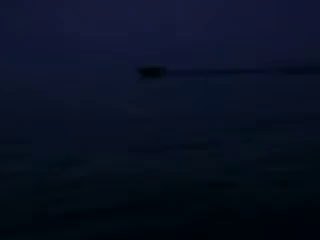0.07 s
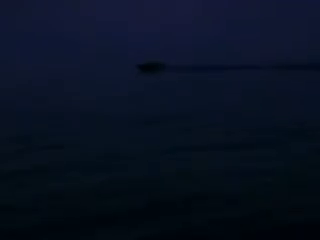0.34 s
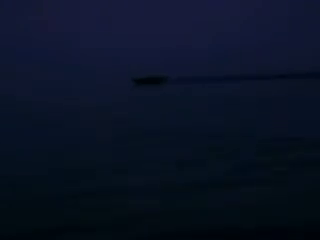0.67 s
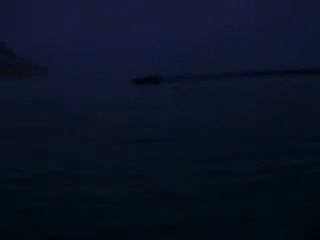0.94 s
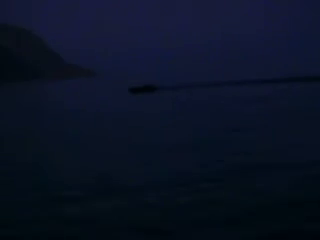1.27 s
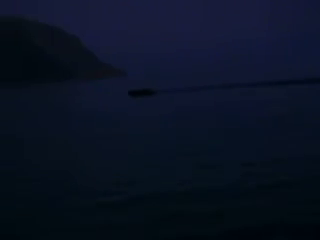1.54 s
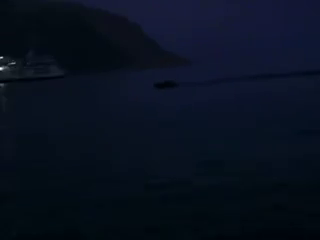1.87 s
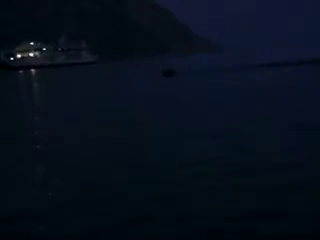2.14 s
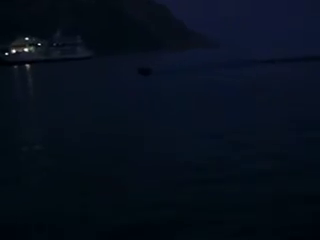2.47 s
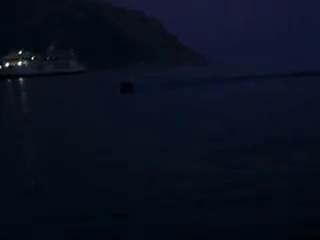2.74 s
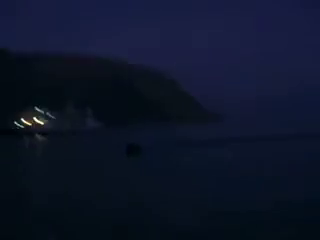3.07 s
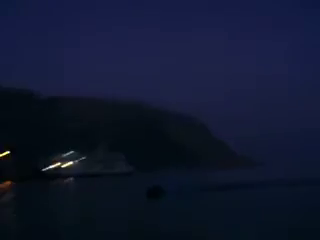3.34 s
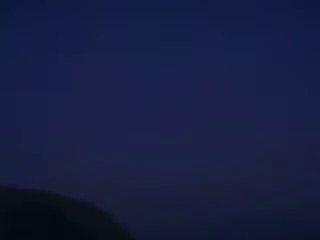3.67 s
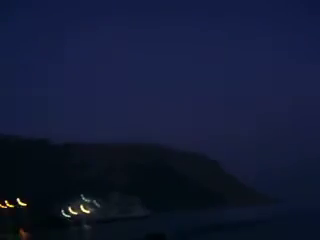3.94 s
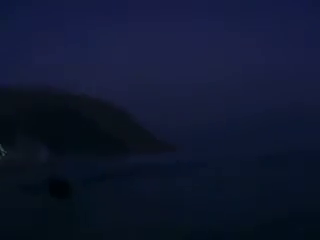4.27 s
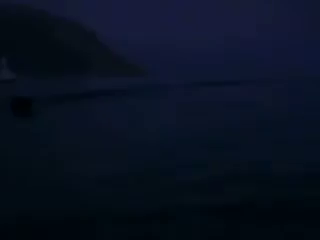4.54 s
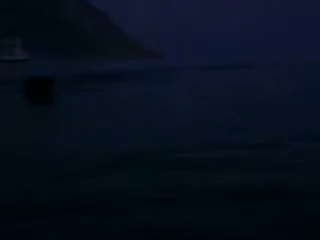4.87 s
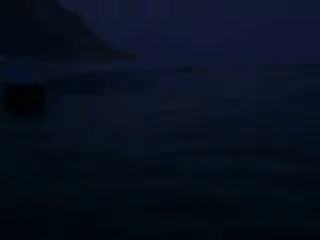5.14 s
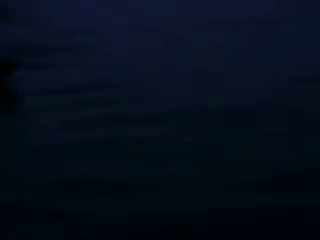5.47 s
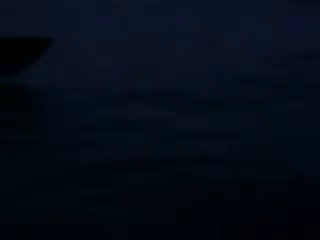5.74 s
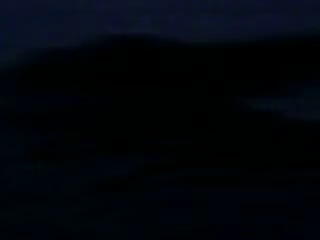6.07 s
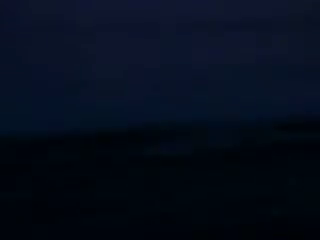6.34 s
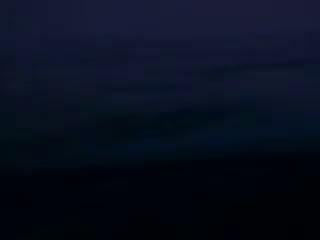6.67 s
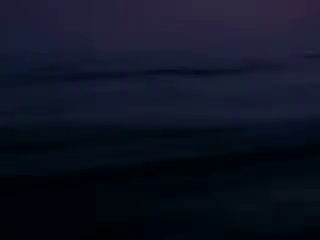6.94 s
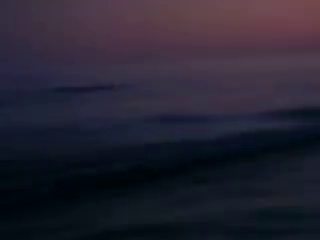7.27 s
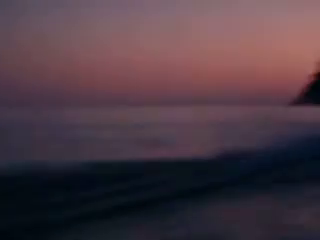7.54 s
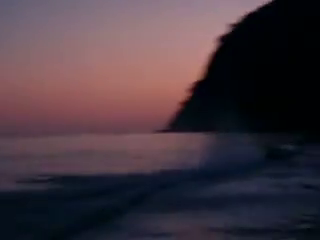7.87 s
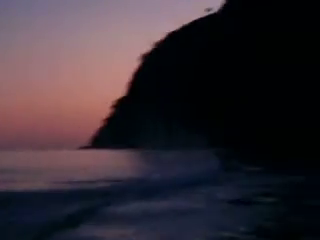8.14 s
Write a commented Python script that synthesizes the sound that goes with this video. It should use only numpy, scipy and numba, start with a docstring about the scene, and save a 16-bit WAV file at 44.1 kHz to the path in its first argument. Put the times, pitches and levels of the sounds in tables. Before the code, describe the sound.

A small model speedboat motor rasps across calm water, dips and picks up, then passes close with a deep hum and churning spray.

```python
"""A radio-controlled speedboat circles on a calm sea, its small motor firing once a turn into a resonant
exhaust pipe. One sharp, bright click comes just after the start; the throttle closes, and the motor
stumbles, then picks up. The boat turns and runs in towards the shore, raspy bow-on, while a few soft
knocks and thumps sound at the narrow-band microphone. At about 5.5 s it passes close by and heads away,
a deep hum in churning spray."""
import sys
import numpy as np
from scipy import signal
from scipy.fft import rfft, irfft, next_fast_len
from scipy.io import wavfile
from scipy.ndimage import uniform_filter1d, map_coordinates
from numba import njit

SR = 44100
rng = np.random.default_rng(int(sys.argv[2]) if len(sys.argv) > 2 else 0)


def wav_record(signal):
    """Record a signal, one row per channel, as 16-bit PCM in the file named by sys.argv[1]."""
    frames = np.transpose(np.atleast_2d(signal))
    bounded = np.clip(frames, -1, 1)
    # unit amplitude maps onto the largest positive 16-bit level
    quanta = np.round(bounded * 32767).astype(np.int16)
    wavfile.write(sys.argv[1], SR, quanta)


N = 361619
TIME = np.arange(N) / SR
HUM_TOP_HZ = 577


def from_db(db):
    """Amplitude ratio of a level in decibels."""
    return 10 ** (np.asarray(db) / 20)


def rms_one(x):
    """Normalisation to rms 1."""
    return x / np.sqrt(np.mean(x ** 2) + 1e-20)


def slow_rms(x):
    """Running rms over many firings."""
    size = SR // 8
    return np.sqrt(uniform_filter1d(uniform_filter1d(x * x, size), size) + 1e-12)


def evened(x):
    """Slow gain control: the running rms is held at 1, while single firings still differ."""
    return x / slow_rms(x)


def in_time(rows):
    """Linear interpolation of a table's columns at every sample."""
    times, *columns = np.transpose(rows)
    return [np.interp(TIME, times, column) for column in columns]


def ramp(start_s, end_s):
    """Linear rise from 0 to 1."""
    return np.clip((TIME - start_s) / (end_s - start_s), 0, 1)


def swell(centre_s, half_s):
    """Gaussian envelope of height 1."""
    return np.exp(-((TIME - centre_s) / half_s) ** 2)


def drift(knots_per_s):
    """Smooth random modulation with a spread of about 1."""
    return map_coordinates(rng.standard_normal(4096), [TIME * knots_per_s], order=3, mode="wrap")


def delayed(x, delay_s):
    """Delay line of steady or changing length."""
    return np.interp(TIME - delay_s, TIME, x, left=0)


def low_passed(x, hz, order):
    """Causal Butterworth low-pass filter."""
    return signal.sosfilt(signal.butter(order, hz, fs=SR, output="sos"), x)


def below(x, hz):
    """Zero-phase crossover: the part of x under hz."""
    return signal.sosfiltfilt(signal.butter(6, hz, fs=SR, output="sos"), x)


def coloured(x, spectrum):
    """Minimum-phase filter with the given spectrum, made causal by folding the cepstrum."""
    size = next_fast_len(N + SR // 2, real=True) // 2 * 2
    hz, db = np.transpose(spectrum)
    bin_hz = np.arange(size // 2 + 1) * SR / size
    gain = from_db(np.interp(np.log(bin_hz + 1), np.log(hz), db))
    cepstrum = irfft(np.log(gain))
    cepstrum[1:size // 2] *= 2
    cepstrum[size // 2 + 1:] = 0
    return irfft(rfft(x, size) * np.exp(rfft(cepstrum)))[:N]


def resonance(x, hz, width_hz):
    """Two-pole resonator with a peak gain of 1."""
    r = np.exp(-np.pi * width_hz / SR)
    poles = [1, -2 * r * np.cos(2 * np.pi * hz / SR), r * r]
    return signal.lfilter(np.array([1, 0, -1]) * (1 - r * r) / 2, poles, x + 1e-18)


@njit
def gliding_resonance(x, hz, width_hz):
    """Two-pole resonator whose centre frequency moves."""
    r = np.exp(-np.pi * width_hz / SR)
    feedback = 2 * r * np.cos(2 * np.pi * hz / SR)
    y = np.zeros(len(x))
    for i in range(2, len(x)):
        y[i] = (1 - r * r) / 2 * (x[i] - x[i - 2]) + feedback[i] * y[i - 1] - r * r * y[i - 2]
    return y


def firings(turns, speed_hz, lost_hz):
    """Impulse train, one firing a turn; its shimmer and jitter grow as the motor stumbles or slows."""
    # bangs and misfires that stand out: time_s, level_db
    odd_firings = [(.211, 3.5), (.221, -3.5), (.3, -4), (.352, -5.5), (.373, -5), (.384, 1.5), (.395, -4.5),
                   (.463, 2), (.486, 1.5), (.498, -5), (.521, -8.5), (.581, -2.5), (.605, 6), (.641, 3),
                   (.7, -3.5), (.712, 3.5), (.723, -6.5), (.759, -2), (.783, 3.5), (.808, 3.5), (.82, -2.5),
                   (.92, 4), (.932, -3.5), (.945, 4), (.957, -6), (1.031, -4.5), (1.093, 4.5), (1.105, -5),
                   (4.335, 1.5), (4.346, 4.5), (4.357, -4), (4.699, 4), (4.954, -2.5), (5.24, -5),
                   (5.25, 2.5)]
    weak_share, weak_db, hardest_db, jitter_ms_per_db, rebound = 0.051, -3, 1.5, 0.012, 0.17
    at = np.flatnonzero(np.diff(np.floor(turns)))
    stumble_db = 0.09 * lost_hz * (1 - ramp(0.96, 1.1))   # ends as the throttle opens again
    slowing_hz_per_s = np.maximum(-np.gradient(speed_hz, TIME), 0)
    uneven_db = (0.74 + stumble_db + 0.012 * slowing_hz_per_s)[at]
    shimmer, jitter = rng.standard_normal((1024, 2))[:len(at)].T
    weak = rng.random(1024)[:len(at)] < weak_share
    swing = rms_one(signal.lfilter([1], [1, rebound], shimmer))   # a soft firing makes the next harder
    firing_db = np.minimum(uneven_db * swing, hardest_db) + weak_db * weak
    for time_s, level_db in odd_firings:
        firing_db[np.argmin(np.abs(TIME[at] - time_s))] = level_db
    late = np.round(jitter_ms_per_db * SR / 1000 * uneven_db * jitter).astype(int)
    pulses = np.zeros(N)
    pulses[np.clip(at + late, 0, N - 1)] = from_db(firing_db)
    return pulses


def exhaust(pulses, speed_hz):
    """Source and filter: each pressure pulse and its puff of gas echo in the pipe and ring its shell."""
    # reflections inside the pipe: delay_ms, gain
    echoes = [(0.729, -0.3), (5.099, 0.051)]
    # modes of pipe and hull: centre_hz, width_hz, gain_db
    modes = [(423, 480, -7.5), (780, 490, -10.5), (1840, 200, -18.5), (2455, 41, -2)]
    # spectral envelope of the exhaust: frequency_hz, gain_db
    pulse_spectrum = [(60, -43.5), (95, -23), (140, -10), (190, 2.5), (350, 2), (560, 2), (760, 4),
                      (930, 3.5), (1100, 8.5), (1300, 1.5), (1600, 3.5), (2100, 1), (2450, -6),
                      (2800, -8.5), (3300, -16.5), (4300, -26.5)]
    gas_db, gas_decay_ms, steady_top_hz, shut_turn = -19, 11, 446, 0.372
    puff = signal.lfilter([1], [1, -np.exp(-1000 / (gas_decay_ms * SR))], pulses + 1e-18)
    gas = rms_one(low_passed(puff * rng.standard_normal(N), hz=1230, order=1))
    # every stroke expels the same volume, so the lows stay even and only the sharp front varies
    front = pulses + below((pulses > 0) - pulses, steady_top_hz)
    # the port shuts part of a turn later, with a weaker pulse of opposite sign
    shutting = -0.18 * delayed(front - below(front, steady_top_hz), shut_turn / speed_hz)
    blast = front + shutting + from_db(gas_db) * np.std(front) * gas
    piped = blast + sum(gain * delayed(blast, ms / 1000) for ms, gain in echoes)
    ringing = sum(from_db(db + 2 * drift(7.8)) * resonance(piped, hz, width) for hz, width, db in modes)
    return evened(coloured(piped + ringing, pulse_spectrum))


def honk(motor, run_in):
    """A hollow resonance of the pipe, fading on the run in."""
    return from_db(-8) * (1 - run_in) * resonance(motor, hz=750, width_hz=140)


def nasal(motor, bared_db):
    """A nasal pipe resonance, strongest bow-on, modulated as water laps over the outlet."""
    # the resonance as the heading changes: time_s, centre_hz, gain
    nasal_path = [(0, 1980, 0.33), (.28, 1950, .3), (.47, 1840, .55), (1.15, 1820, .35), (1.9, 2120, 0.69),
                  (2.65, 2114, 0.87), (4.7, 2180, 1.4), (5.35, 2100, 1.0), (5.7, 2200, 0.2),
                  (6.3, 1880, 0.17), (8.2, 1860, 0.18)]
    centre_hz, gain = in_time(nasal_path)
    centre_hz = centre_hz + 40 * drift(25)
    gain = gain * from_db(3 * drift(40)) + 0.18 * np.clip(bared_db, 0, 3.5)
    return gain * gliding_resonance(motor, centre_hz, width_hz=330)


def snarl(motor, speed_hz):
    """A formant on the 16th harmonic slides down with the speed as the throttle closes."""
    gain = from_db(-7.5) * (1 - ramp(0.55, 0.58))
    return gain * gliding_resonance(motor, 16 * speed_hz, width_hz=300)


def shore_reflection(motor):
    """A weak reflection of the upper band off the shore; with the direct sound it forms a comb filter."""
    # lag behind the direct sound, growing as the boat runs in: time_s, delay_ms
    shore_lag = [(3.2, 2.824), (4.5, 3.7)]
    delay_ms, = in_time(shore_lag)
    return 0.11 * delayed(motor - below(motor, HUM_TOP_HZ), delay_ms / 1000)


def churn(turns):
    """Turbulence at the propeller: lumpy noise, amplitude-modulated at the shaft rate."""
    # spectrum of the churning water: frequency_hz, gain_db
    churn_spectrum = [(30, -36.5), (110, -23.5), (190, -19.5), (330, -0.5), (550, 3), (1000, 3.5),
                      (1400, 0.5), (2100, -3.5), (2700, -12), (3300, -11.5), (4300, -31)]
    throb = 1 + 0.16 * np.cos(2 * np.pi * turns)
    lumps = from_db(-0.5 * drift(120))
    return rms_one(coloured(throb * lumps * rng.standard_normal(N), churn_spectrum))


def radiated(boat, level_db, bow, astern, lost_hz, bared_db):
    """Directivity and shielding: heading, distance, speed and waves weight the bass, rasp and edge."""
    # gain of each band: side_db, bow_added_db, astern_added_db, db_per_lost_hz, db_per_near_db
    bass_weights = (1.0, 3.5, 4, 0.13, -0.2)
    rasp_weights = (0.19, 1.3, -1.7, -0.094, -0.48)
    edge_weights = (-8, 7.5, 1, -0.56, 0.49)
    bass_top_hz, bark_top_hz, rasp_top_hz = 540, 1330, 2271
    near_db = level_db - level_db.mean()
    bass_db, rasp_db, edge_db = (
        side + ahead * bow + behind * astern + slowed * lost_hz + near * near_db
        for side, ahead, behind, slowed, near in (bass_weights, rasp_weights, edge_weights))
    bass_db = bass_db + 0.88 * bow * near_db   # bow-on, the bass grows faster as the boat nears
    body, under_edge = below(boat, bark_top_hz), below(boat, rasp_top_hz)
    bark = body / slow_rms(body - below(body, HUM_TOP_HZ))
    bass_lift = (from_db(bass_db) - 1) * below(bark, bass_top_hz)
    rasp = from_db(rasp_db) * evened(under_edge - body)
    edge = from_db(edge_db) * evened(boat - under_edge)
    return from_db(level_db) * (bark + bass_lift + from_db(bared_db) * (rasp + edge))


def hum(turns, far_db, bow, astern):
    """The pipe mouth radiates low harmonics; choppy water modulates their level and phase."""
    # harmonics heard from astern: order, closest_db, fall_db_per_far_db, bow_added_db
    harmonics = [(1, -56, 2, -15.5), (2, -33, 1.23, -12.5), (3, -31.5, 1.0, -8), (4, -26.5, 0.35, -13.5),
                 (5, -26.5, 5, -1), (6, -28.5, 2.5, -10.5), (7, -32, 0.93, -11), (8, -35, 5.5, -18),
                 (9, -41, 0.5, -18), (10, -38.5, 1, -17), (11, -40, 8.5, -19.5), (12, -43.5, 2, -14)]
    # one harmonic of the hum swells briefly: centre_s, half_length_s, order, level_db
    harmonic_swells = [(0.09, 0.12, 4, -35.5), (.09, 0.33, 7, -43.5), (0.83, 0.1, 4, -35),
                       (5.642, 0.26, 7, -34.5), (5.687, 0.075, 4, -33.5), (5.773, .04, 8, -34.5),
                       (5.833, 0.04, 5, -29.5), (5.977, 0.12, 4, -35), (6.196, 0.083, 3, -26.5),
                       (6.17, 0.033, 6, -23.5), (6.2, 0.025, 7, -30), (6.295, 0.029, 9, -38),
                       (6.458, 0.032, 2, -30.5), (6.62, 0.1, 5, -37), (6.718, 0.069, 6, -37),
                       (6.721, 0.088, 8, -29), (6.88, 0.1, 4, -28.5), (7.017, 0.023, 7, -36),
                       (7.092, 0.025, 4, -25.5), (7.787, 0.13, 4, -32.5)]
    choppy = from_db(-0.84 * far_db * astern)   # the tones steady as the boat draws away
    tones = 0
    for order, closest_db, fall, bow_db in harmonics:
        phase = 2 * np.pi * order * turns + choppy * drift(8.1)
        directivity = astern ** 2 + from_db(bow_db) * bow
        sustained = directivity * from_db(closest_db - fall * far_db + 3 * choppy * drift(14))
        swelling = sum(from_db(db) * swell(s, half_s) for s, half_s, k, db in harmonic_swells
                       if k == order)
        tones = tones + (sustained + swelling) * np.sin(phase)
    return np.sqrt(2) * tones


def rumble():
    """Ambient noise: the faint low rumble of the open air."""
    return from_db(-71.5) * rms_one(low_passed(rng.standard_normal(N), hz=90, order=2))


def click(start_s=0.092, level_db=-20, decay_ms=0.45):
    """One sharp, bright click just after the start: a step with exponential decay."""
    return from_db(level_db) * (TIME >= start_s) * np.exp(-np.abs(TIME - start_s) * 1000 / decay_ms)


def hull_ring(motor, bow, run_in):
    """Forced vibration: the motor drives a narrow hull mode, heard bow-on during the run in."""
    return from_db(4.5) * bow * run_in * resonance(motor, hz=1603, width_hz=31)


def knocks():
    """Soft knocks at the microphone: heavily damped impulse responses."""
    # impacts: start_s, level_db
    impacts = [(3.143, -11.5), (3.76, -10), (4.74, -20)]
    # spectrum of a knock: frequency_hz, gain_db
    knock_spectrum = [(40, -27), (110, -14), (200, -1.5), (350, 2), (800, -1.5), (1400, -9.5), (2500, -53),
                      (4300, -52.5)]
    taps = np.zeros(N)
    for start_s, level_db in impacts:
        taps[round(start_s * SR)] = from_db(level_db)
    bumps = coloured(taps, knock_spectrum)
    return bumps * taps.max() / np.abs(bumps).max()


def thumps(width_hz=420):
    """Hollow thumps close to the microphone: short noise bursts excite a broad resonance."""
    # bursts: centre_s, half_length_s, pitch_hz, peak_db
    bursts = [(3.791, 0.0071, 330, -21), (3.803, .006, 290, -17), (4.056, 0.0044, 443, -19)]
    out = 0
    for centre_s, half_s, pitch_hz, peak_db in bursts:
        burst = swell(centre_s, half_s) * rng.standard_normal(N)
        thump = resonance(resonance(burst, pitch_hz, width_hz), pitch_hz, width_hz)
        out = out + from_db(peak_db) * thump / np.abs(thump).max()
    return out


def scene():
    """Superposition of the moving boat, the knocks, the thumps and the air, in mono."""
    # motor speed: time_s, firing_rate_hz
    speed_curve = [(0.0, 107.59), (0.11, 110.64), (0.19, 107.96), (0.28, 99.53), (0.39, 90.99),
                   (0.54, 82.8), (0.7, 85.23), (0.86, 79.88), (1.1, 81.84), (1.31, 84.51), (1.5, 89.33),
                   (1.69, 92.29), (1.78, 95.57), (2.15, 99.78), (2.44, 99.12), (2.6, 94.78), (2.98, 91.02),
                   (3.17, 93.46), (3.3, 91.94), (3.94, 92.83), (4.24, 94.9), (4.46, 93.4), (4.81, 93.73),
                   (5.14, 94.75), (5.69, 94.23), (6.12, 91.78), (6.26, 92.0), (6.91, 89.45), (7.16, 93.1),
                   (7.28, 98.37), (7.63, 97.65), (7.68, 99.99), (7.84, 99.2), (7.91, 97.2), (8.2, 97.1)]
    # loudness of the boat at the shore: time_s, level_db
    level_curve = [(0, -29.5), (.12, -28.5), (.28, -32.5), (.85, -32.5), (1.3, -32.5), (2.0, -32.5),
                   (2.6, -36.5), (3.5, -35.5), (4.0, -34), (4.75, -32.5), (5.3, -30.5), (5.75, -30),
                   (6.3, -29), (6.9, -31), (7.55, -33.5), (8.2, -36.5)]
    # waves bare (+) or cover (-) the outlet: centre_s, half_length_s, treble_db
    waves = [(0.07, .12, 0.5), (0.457, 0.14, 3), (1.143, 0.097, -3), (1.47, 0.058, -2.5),
             (2.22, 0.066, -4.5), (2.874, 0.045, 2.5), (2.97, 0.05, -1), (3.97, .07, 1.5),
             (5.024, 0.082, 1), (5.17, 0.035, -1), (5.465, 0.028, -4), (5.84, 0.16, -1), (6.334, 0.049, 3),
             (6.708, 0.047, 2), (7.08, 0.098, 1), (7.775, 0.045, -1.5), (7.902, 0.025, 8.5),
             (8.094, 0.14, -1.5)]
    speed_hz, = in_time(speed_curve)
    level_db, = in_time(level_curve)
    far_db = level_db.max() - level_db
    lost_hz = np.maximum(93.1 - speed_hz, 0)   # shortfall from the clean-running speed
    astern = ramp(5.33, 5.63)   # the boat passes and shows its stern
    bow = ramp(1.45, 2.86) * (1 - astern)   # the bow swings towards the shore
    run_in = ramp(1.9, 3.3)
    ripple_db = 0.5 * drift(10)
    bared_db = sum(db * swell(s, half_s) for s, half_s, db in waves) + ripple_db
    # the propeller's changing bite makes the shaft run a little early or late
    turns = np.cumsum(speed_hz) / SR + 0.007 * drift(14)
    motor = exhaust(firings(turns, speed_hz, lost_hz), speed_hz)
    pipe_rings = honk(motor, run_in) + nasal(motor, bared_db) + snarl(motor, speed_hz)
    motor = motor + pipe_rings + hull_ring(motor, bow, run_in)
    motor = motor + shore_reflection(motor)
    # from astern, the lows of the sharp firings give way to the smooth hum
    motor = motor - 0.47 * astern * below(motor, HUM_TOP_HZ)
    churn_share = np.clip(0.18 + 0.6 * astern * from_db(-0.84 * far_db - bared_db), 0.01, 0.95)
    boat = np.sqrt(1 - churn_share) * motor + np.sqrt(churn_share) * churn(turns)
    heard = radiated(boat, level_db, bow, astern, lost_hz, bared_db)
    return (heard + hum(turns, far_db, bow, astern) + knocks() + thumps() + rumble())[None]


def record(dry):
    """Band limiting: the microphone cuts the treble; the click is added after it and stays bright."""
    narrow = low_passed(below(dry, hz=3760), hz=4400, order=24)
    top_cut = signal.cheby2(12, 70, 17000, fs=SR, output="sos")
    return signal.sosfilt(top_cut, narrow + click())


dry = scene()
out = record(dry)
wav_record(out)
```